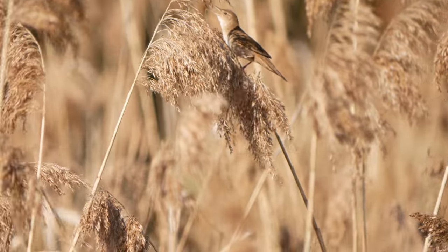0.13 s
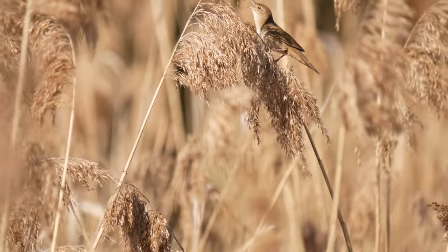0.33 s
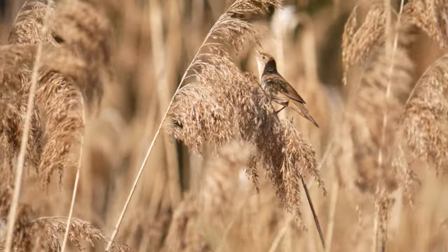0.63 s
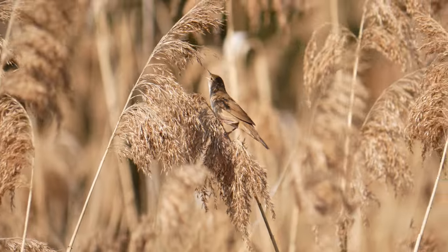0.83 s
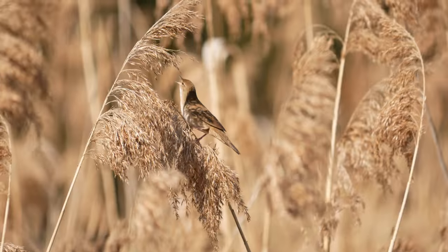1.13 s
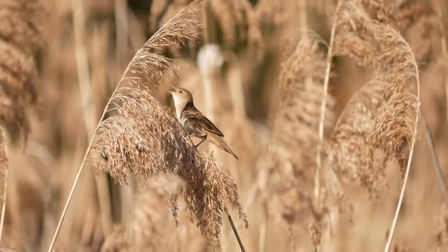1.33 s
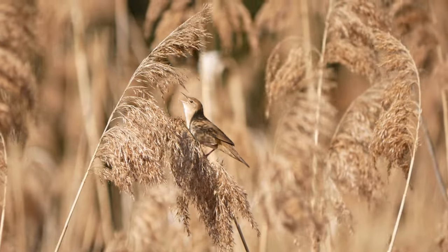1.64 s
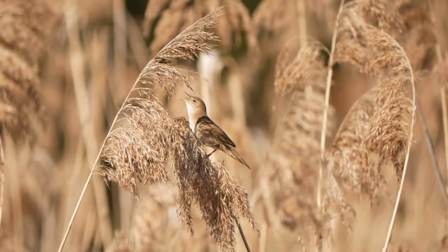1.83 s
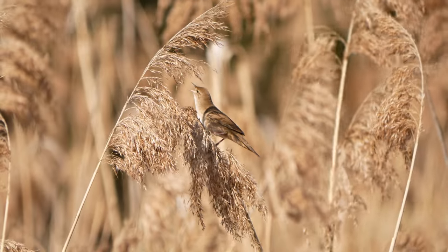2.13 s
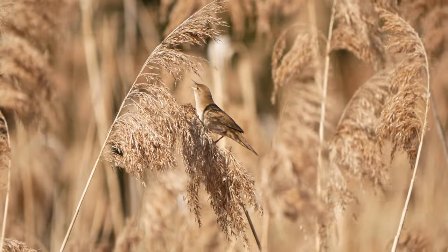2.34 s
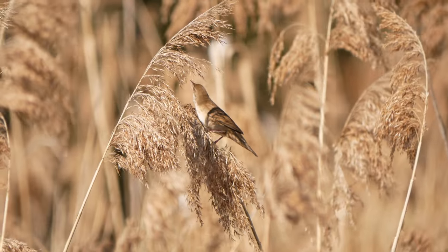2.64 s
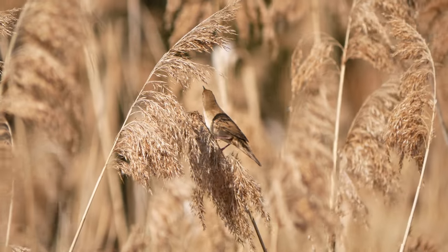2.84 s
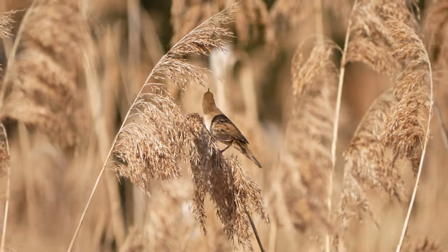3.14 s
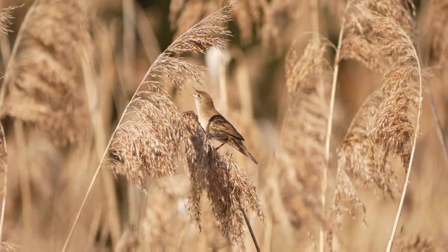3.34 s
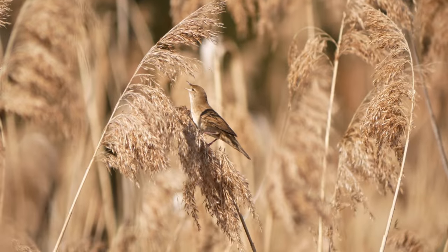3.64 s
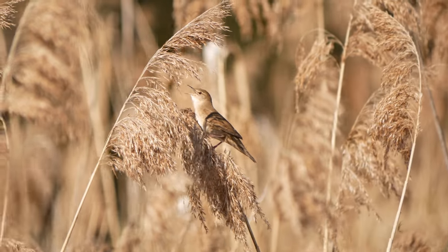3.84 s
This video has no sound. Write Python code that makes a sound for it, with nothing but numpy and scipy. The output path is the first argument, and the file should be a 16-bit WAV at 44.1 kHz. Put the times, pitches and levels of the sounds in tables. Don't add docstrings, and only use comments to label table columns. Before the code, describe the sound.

Continuous high buzzing trill of a reed bird, with faint distant birds and low wind buffeting.

```python
import sys
import numpy as np
from scipy import signal
from scipy.fft import rfft, irfft
from scipy.io import wavfile
from scipy.ndimage import uniform_filter1d

SR = 44100
rng = np.random.default_rng(int(sys.argv[2]) if len(sys.argv) > 2 else 0)


def volts(x):
    e = np.asarray(x, float) / 20
    return 10 ** e


def generate_wav(sig):
    pcm = np.round(np.clip(np.atleast_2d(sig).T, -1, 1) * 32767).astype(np.int16)
    wavfile.write(sys.argv[1], SR, pcm)


N = 176400

FLUTTER_DB = 3.5


def rms_one(x):
    return x / np.sqrt(np.mean(x ** 2) + 1e-20)


def in_time(rows, s):
    at, *columns = np.transpose(rows)
    return [np.interp(s, at, c) for c in columns]


def at_hz(points, hz):
    table_hz, values = np.transpose(points)
    return np.interp(np.log(hz), np.log(table_hz), values)


def drift(rate_hz):
    r = np.exp(-2 * np.pi * rate_hz * 40 / SR)
    noise = rng.standard_normal(N // 40 + 2002)
    slow = signal.lfilter([1], [1, -2 * r, r * r], noise)[2000:]
    return np.interp(np.arange(N) / 40, np.arange(len(slow)), rms_one(slow - slow.mean()))


def add(out, s, piece):
    i = max(int(s * SR), 0)
    out[..., i:i + piece.shape[-1]] += piece[..., :max(N - i, 0)]


def pan(x, db):
    return x * volts(np.array([[db / 2], [-db / 2]]))


def two_ears(mid, side, alike):
    return mid, side * [[1], [-1]], alike


def coloured(spectrum, patchy_db, top_hz):
    # (frequency [Hz], likeness [0-1])
    likeness = [(60, 1), (200, 0.35), (500, 0.33), (1500, 0.071), (4000, 0.82), (9000, 0.17)]
    hz = np.maximum(np.arange(N // 2 + 1) * SR / N, 1)
    mid, side = rfft(rng.standard_normal((2, N))) * volts(at_hz(spectrum, hz)) * (hz < top_hz)
    alike = np.clip(at_hz(likeness, hz), 0, 1)
    both = np.sqrt(1 + alike) * mid + np.sqrt(1 - alike) * side * [[1], [-1]]
    position = np.clip(2 * np.log2(hz / 25), 0, 18)
    out = np.zeros((2, N))
    for k in range(19):
        band = irfft(both * np.clip(1 - abs(position - k), 0, 1), N)
        out += volts(patchy_db * drift(6.4)) * band
    return rms_one(out)


def air():
    # (time [s], level [dB])
    breeze = [(.25, 7.5), (.7, 2.5), (1.1, 4.5), (2.7, 1.5), (3.3, 4.5)]
    # (frequency [Hz], density [dB per Hz])
    air_colour = [(30, -23.5), (110, 1.5), (300, -10.5), (1100, -14.5), (1500, -22), (2400, -23.5),
                  (5000, -24), (6500, -37)]
    # (frequency [Hz], density [dB per Hz])
    rustle_colour = [(5500, -25), (6800, -12), (7900, -15), (8400, -13.5), (10500, -10.5), (12500, -21.5),
                     (15000, -36)]
    breeze_db, = in_time(breeze, np.arange(N) / SR)
    body = volts(-51) * coloured(air_colour, 1.7, 7200)
    rustle = volts(-77.5) * coloured(rustle_colour, 3.3, 15400)
    return volts(breeze_db) * (body + rustle)


def hoarse():
    # (time [s], length [s], centre [Hz], width [Hz], level [dB])
    calls = [
        (0.201, 0.29, 1073, 202, -53.5),
        (0.934, 0.23, 901, 40.7, -56.5),
        (1.0, 0.44, 1435, 88, -61),
        (0.808, 0.36, 1530, 706, -55.5),
        (1.765, 0.12, 2040, 250, -61),
        (3.089, 0.35, 1070, 181, -56.5),
        (3.574, 0.024, 1200, 680, -49.5),
    ]
    out = np.zeros(N)
    for s, length, hz, width_hz, db in calls:
        u = np.linspace(0, 1, int(length * SR))
        throb = 1 + .5 * np.sin(2 * np.pi * 70 * u * length)
        noise = rng.standard_normal(len(u)) * throb
        edges_hz = [hz - width_hz / 2, hz + width_hz / 2]
        throat = signal.butter(2, edges_hz, "band", fs=SR, output="sos")
        add(out, s, volts(db) * rms_one(signal.sosfilt(throat, noise)) * np.sin(np.pi * u) ** 0.15)
    return pan(out, -3.5)


def reel():
    # (time [s], level [dB])
    head_turn = [(.26, -45), (.75, -43.5), (1.1, -45), (1.2, -48), (1.4, -42.5), (1.8, -45), (2.05, -43),
                 (2.5, -45.5), (2.75, -48.5), (3.2, -43.5), (3.7, -48), (3.99, -44)]
    # (start from main peak [s], attack [s], decay [s], from [Hz], to [Hz],
    # sweep [s], level [dB], octave level [dB])
    pair = [
        (-.0092, 0.0016, 0.00085, 2458, 4604, 0.00055, 9, -7.5),
        (-.0021, 0.0021, .0014, 3360, 4100, 0.00047, 14.5, -45),
    ]
    after_ring = (-0.0075, .0006, 0.0028, 4070, 4070, 1, 1, -60)
    octave_peaks_hz = (5650, 8200, 8400)
    first_s, period_s, slowing_s = .2539, .020405, 8.0e-7
    pitch_spread, level_spread_db, jitter_s = .008, 1.1, .00012

    out = np.zeros(N)
    k = np.arange(-2, 184)
    t = np.arange(int(.012 * SR)) / SR
    peaks = first_s + period_s * k + slowing_s * k ** 2 / 2
    level_db, = in_time(head_turn, peaks)
    for note, octave_hz in zip([*pair, after_ring], octave_peaks_hz):
        start, attack, decay, from_hz, to_hz, sweep, db, octave_db = note
        luck = rng.standard_normal((len(k), 4))
        hz = to_hz + (from_hz - to_hz) * np.exp(-(t / sweep / 2) ** 2)
        turns = np.cumsum(hz) / SR
        phase = 2 * np.pi * (turns * (1 + pitch_spread * luck[:, :1]) + luck[:, 3:])
        late = np.maximum(t - attack, 0) / decay
        rise = np.sin(np.pi / 2 * np.minimum(t / attack, 1)) ** 2
        shape = rise * np.exp(-late ** 2 / (1 + 0.2 * late))
        throat = np.exp(-((2 * hz - octave_hz) / 1100) ** 2)
        octave = volts(octave_db) * np.sin(2 * phase) * throat
        gain = volts(level_db + db + level_spread_db * luck[:, 1])[:, None]
        chirps = (shape * np.sin(phase) + np.sqrt(shape) * octave) * gain
        for s, chirp in zip(peaks + start + jitter_s * luck[:, 2], chirps):
            add(out, s, chirp)
    return pan(out, -0.57)


def reeds(x):
    t60_s, alike = 0.3, 0.28
    t = np.arange(int(.4 * SR)) / SR
    decay = volts(-60 * t / t60_s) * np.minimum(t / 0.0029, 1)
    mid, side = rng.standard_normal((2, len(t))) * decay
    tails = np.sqrt(alike) * mid + np.sqrt(1 - alike) * side * [[1], [-1]]
    tails = tails / np.sqrt(np.sum(tails ** 2) / 2)
    return volts(-14.5) * signal.fftconvolve(x, tails, axes=-1)[:, :N]


def glides(rows):
    out = np.zeros(N)
    for s, length, from_hz, to_hz, db in rows:
        u = np.linspace(0, 1, int(length * SR))
        hz = to_hz + (from_hz - to_hz) * (1 - u) ** 0.98
        shape = np.clip(np.minimum(u, 1 - u) / .3, 0, 1)
        add(out, s, volts(db + 6.5) * shape * np.sin(2 * np.pi * np.cumsum(hz) / SR))
    return out * volts(FLUTTER_DB * drift(92))


def whistles():
    # (time [s], length [s], from [Hz], to [Hz], level [dB])
    thin_notes = [(.268, 0.012, 4970, 6130, -58), (.338, 0.02, 4920, 5980, -53.5),
                  (.408, 0.012, 4660, 5840, -62.5), (.722, .026, 6640, 5210, -63),
                  (.888, 0.0099, 4660, 5530, -56), (.905, 0.014, 4700, 5350, -48),
                  (1.132, 0.036, 6640, 4500, -66.5), (1.92, 0.063, 4600, 5860, -58.5),
                  (3.068, 0.013, 6530, 5190, -64), (3.535, .014, 5950, 4780, -61),
                  (2.478, 0.027, 4700, 4720, -56.5), (2.51, 0.026, 4770, 4800, -55)]
    return pan(glides(thin_notes), -1)


def chatter():
    # (time [s], length [s], from [Hz], to [Hz], level [dB])
    low_notes = [(.285, 0.023, 3350, 2500, -55.5), (.36, 0.018, 3200, 2720, -57.5),
                 (.42, 0.021, 3260, 2730, -62.5), (.455, .015, 3030, 2540, -59),
                 (.5, .014, 3060, 2660, -53.5), (.652, 0.014, 2960, 2730, -54.5),
                 (.77, 0.045, 3530, 3060, -58), (.812, 0.012, 3100, 2750, -56), (.97, .02, 3110, 2580, -58),
                 (1.068, .025, 3730, 2320, -58), (1.125, 0.026, 3230, 1956, -61),
                 (1.155, 0.077, 2854, 2980, -68), (1.262, 0.015, 2630, 3080, -56),
                 (1.29, 0.031, 2910, 1870, -63.5), (1.405, 0.017, 3020, 2660, -52),
                 (1.42, 0.015, 2340, 1836, -61), (1.465, 0.02, 2240, 1950, -56),
                 (1.585, 0.017, 3690, 3130, -56.5), (1.615, 0.055, 3400, 3430, -65),
                 (1.735, .035, 3630, 2030, -58), (2.355, .07, 2850, 3610, -61),
                 (2.77, 0.055, 2506, 2590, -68), (2.865, 0.021, 3170, 2380, -58),
                 (3.18, 0.029, 2880, 3080, -65.5), (3.22, 0.044, 2850, 2500, -67.5),
                 (3.3, .06, 2900, 2990, -66), (3.415, 0.045, 2760, 2526, -63),
                 (3.675, 0.045, 3160, 3360, -63), (3.84, 0.049, 3830, 3570, -58),
                 (3.905, .03, 3320, 2600, -62.5), (3.975, 0.045, 3140, 2460, -69)]
    return pan(glides(low_notes), 7.5)


def wind():
    # (peak time [s], peak level [dB], pitch [Hz])
    buffets = [(0.301, -27.5, 178), (0.939, -25.5, 114), (0.974, -27, 140), (0.994, -19, 204),
               (1.017, -24.5, 184), (1.038, -26.5, 152), (1.062, -25, 156), (1.094, -23.2, 164),
               (1.108, -24.5, 153), (1.128, -23.3, 164), (1.165, -18, 165), (1.198, -17, 183),
               (1.218, -28, 158), (1.254, -20.5, 165), (1.271, -21, 152), (1.319, -29.5, 234),
               (1.352, -21.5, 162), (1.374, -25, 142), (1.451, -22, 167), (1.549, -21, 147),
               (1.67, -24, 219), (1.684, -23, 124), (1.996, -24.5, 116), (2.094, -26, 176),
               (2.117, -23.5, 173), (2.133, -30.5, 287), (2.201, -28, 180), (2.217, -20.5, 195),
               (2.243, -24.5, 171), (2.416, -20.5, 149.4), (2.544, -24.9, 146), (2.576, -15.5, 159.4),
               (2.614, -16.5, 201), (2.627, -26, 151), (2.662, -18.5, 178), (2.688, -26, 201),
               (2.755, -25.5, 125), (2.918, -24.7, 170), (2.962, -21, 201), (3.125, -23.5, 223),
               (3.189, -21.6, 206), (3.226, -23.5, 217), (3.249, -24.5, 166.3), (3.273, -28.5, 181),
               (3.288, -24.9, 179), (3.312, -35, 133), (3.351, -18, 153), (3.371, -23.5, 206),
               (3.385, -29.5, 182), (3.401, -25.5, 148), (3.534, -22, 128), (3.593, -25, 130),
               (3.625, -23.5, 137), (3.649, -22.5, 122), (3.687, -24.5, 140), (3.911, -26.5, 121),
               (3.938, -27, 138), (3.975, -17.5, 166),
               (0.38, -30.5, 130), (0.399, -33.5, 119), (0.419, -35, 132), (0.818, -34.5, 111),
             (.845, -38.5, 110), (1.41, -28.5, 153), (1.529, -28, 134), (2.375, -27, 113),
             (2.598, -17.5, 244), (3.488, -29.5, 147), (1.75, -32.5, 123), (2.279, -33, 130)]
    # (frequency [Hz], density [dB per Hz])
    turbulence_colour = [(40, -7), (90, 4.5), (140, 3.5), (220, -10), (320, -18.5), (700, -48)]
    attack_s, decay_s, sag, sag_s = 0.00673, 0.0067, 0.52, 0.0087
    swell_rise_s, swell_fall_s = .016, 0.032

    thumps, swell = np.zeros(N), np.zeros(N)
    every = np.arange(N) / SR
    t = np.arange(int(.12 * SR)) / SR
    rise = np.sin(np.pi / 2 * np.minimum(t / attack_s, 1)) ** 2
    shape = rise * np.exp(-np.maximum(t - attack_s, 0) / decay_s)
    for s, db, pitch_hz in buffets:
        hz = pitch_hz * (1 + sag * (np.exp(-t / sag_s) - .4))
        phase = 2 * np.pi * np.cumsum(hz) / SR + rng.standard_normal()
        add(thumps, s - attack_s, volts(db - 1) * shape * np.sin(phase))
        late = every - s
        swell += volts(db - 17) * np.exp(np.minimum(late / swell_rise_s, -late / swell_fall_s))

    lumps = volts(2.0 * drift(25))
    turbulence = rms_one(coloured(turbulence_colour, 2.3, 1100)[0] * lumps)
    port = signal.butter(3, 75, "high", fs=SR, output="sos")
    mid = signal.sosfilt(port, thumps + swell * turbulence)
    cracked = mid + volts(22) * mid ** 2
    bright = signal.sosfiltfilt(signal.butter(2, 263, "high", fs=SR, output="sos"), cracked)
    lag = volts(-13.5) * signal.hilbert(mid).imag
    side = lag + volts(-9.0) * bright
    return mid + volts(-10.0) * bright + side * [[1], [-1]]


def slurs():
    # (time [s], pitch [Hz], level [dB])
    paths = [
        [(.357, 6800, -64), (.372, 5400, -72), (.39, 4400, -54)],
        [(.645, 5800, -69.5), (.705, 5500, -59.5), (.765, 4750, -59)],
        [(.772, 7600, -75), (.815, 6700, -72), (.86, 6300, -59), (.905, 5800, -64)],
        [(.9, 5600, -64), (.92, 5250, -69), (.96, 4850, -56)],
        [(1.535, 7000, -72), (1.555, 5400, -68), (1.58, 5700, -71)],
        [(1.913, 6900, -61), (1.93, 5000, -62), (1.95, 4300, -59)],
        [(3.09, 4800, -62), (3.11, 5000, -59), (3.13, 4800, -77)],
        [(3.232, 7700, -70.5), (3.29, 5000, -59), (3.32, 4650, -68)],
        [(3.422, 6600, -61), (3.436, 4700, -61), (3.46, 5000, -69), (3.49, 4800, -55)],
        [(3.805, 6900, -68), (3.822, 6000, -71), (3.835, 4600, -52)],
    ]
    out = np.zeros(N)
    for path in paths:
        t = np.arange(path[0][0], path[-1][0], 1 / SR)
        hz, db = in_time(path, t)
        hz = uniform_filter1d(hz, size=400, mode="nearest")
        shape = np.clip(np.minimum(t - t[0], t[-1] - t) / 0.0054, 0, 1)
        add(out, t[0], volts(db + 8) * shape * np.sin(2 * np.pi * np.cumsum(hz) / SR))
    return pan(out * volts(FLUTTER_DB * drift(100)), -1)


def scene():
    bird = reel()
    far = whistles() + chatter() + slurs()
    return air() + hoarse() + bird + reeds(bird + volts(10.5) * far) + far + wind()


def band_limit(x):
    return signal.sosfilt(signal.butter(12, 15350, fs=SR, output="sos"), x)


def record(dry):
    started = np.arange(N) >= .2495 * SR
    return band_limit(dry * started)


dry = scene()
out = record(dry)
generate_wav(out)
```